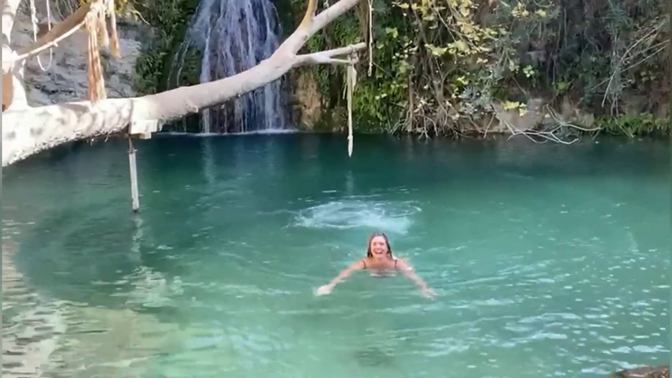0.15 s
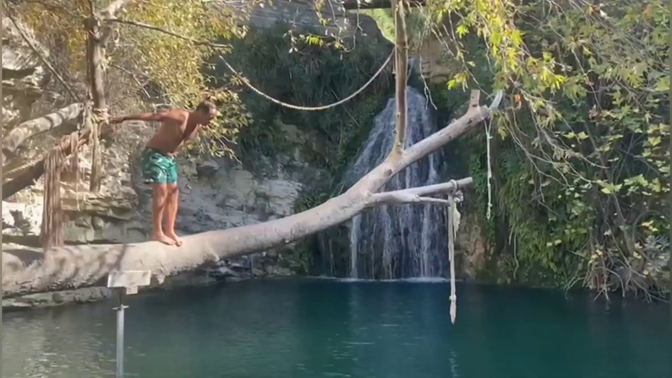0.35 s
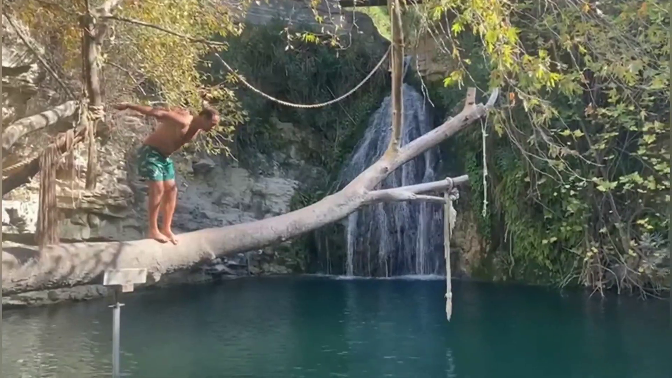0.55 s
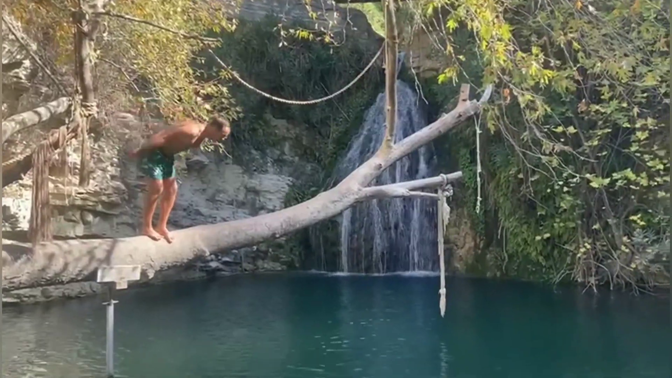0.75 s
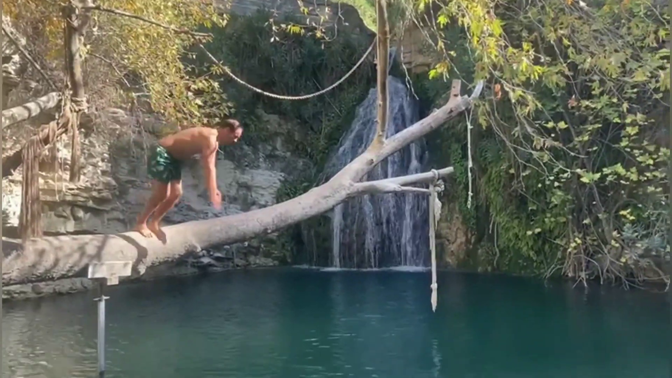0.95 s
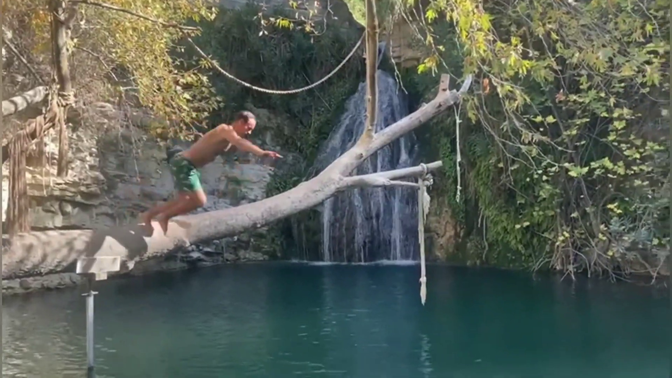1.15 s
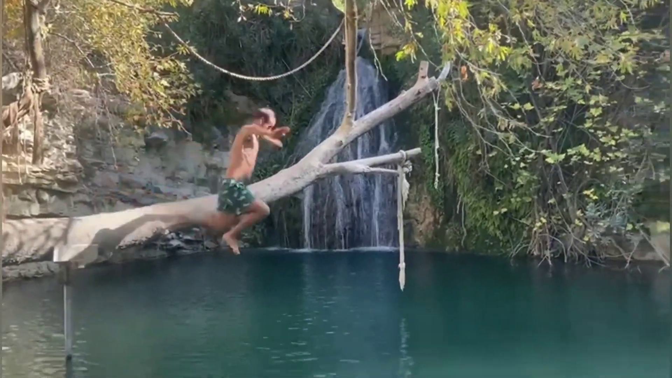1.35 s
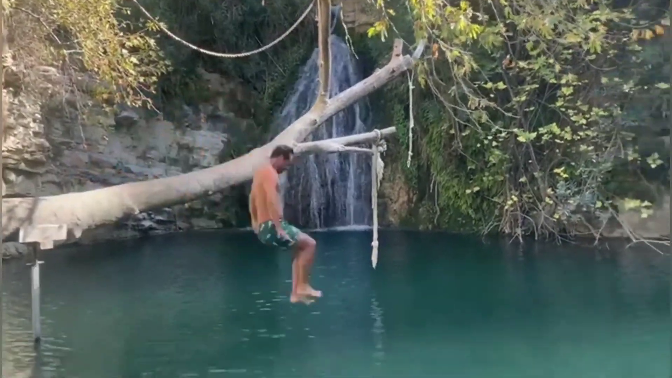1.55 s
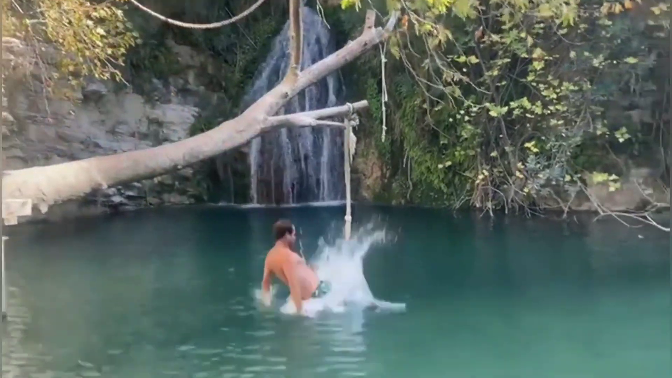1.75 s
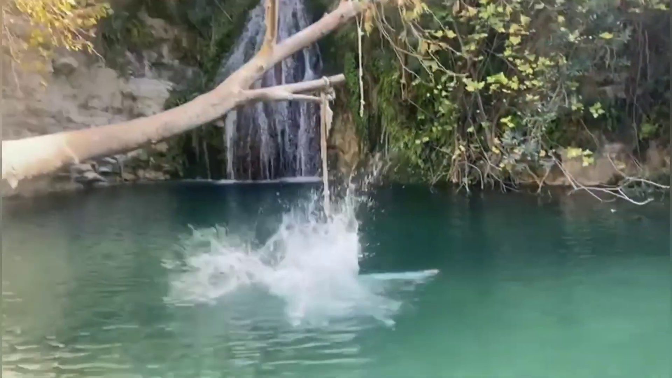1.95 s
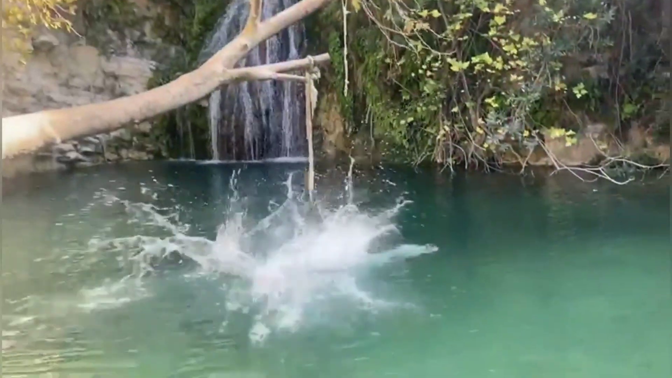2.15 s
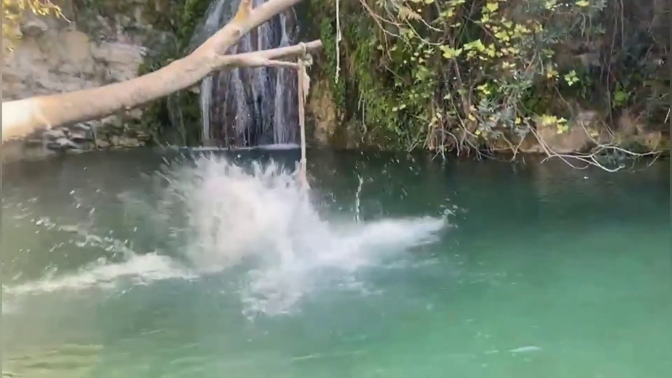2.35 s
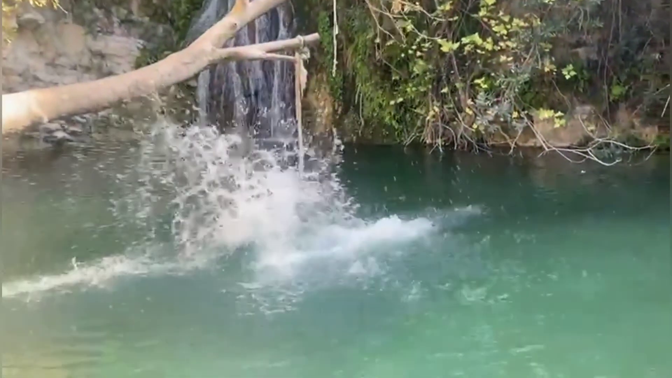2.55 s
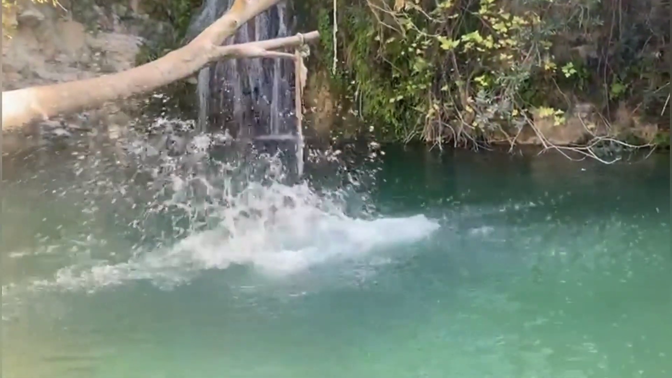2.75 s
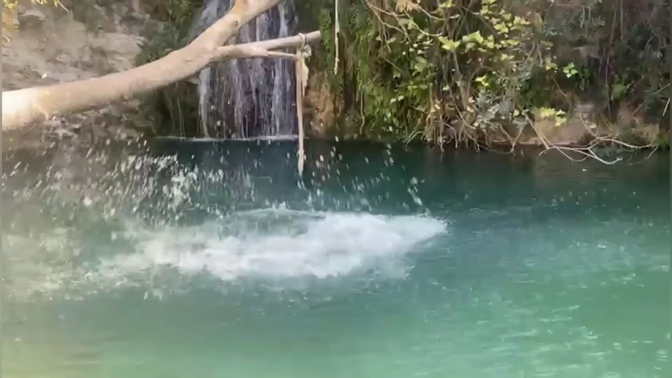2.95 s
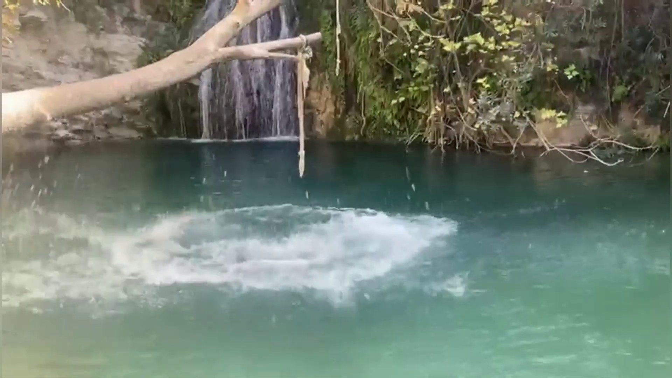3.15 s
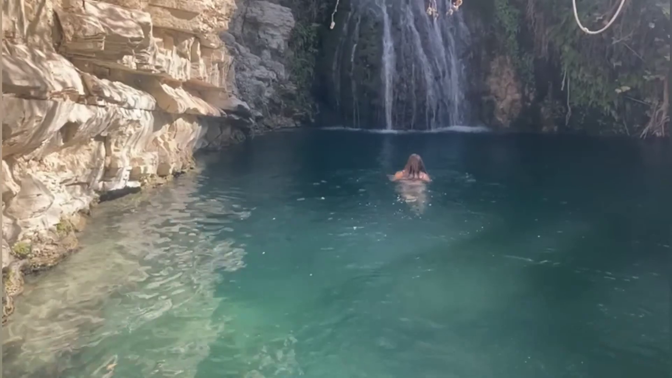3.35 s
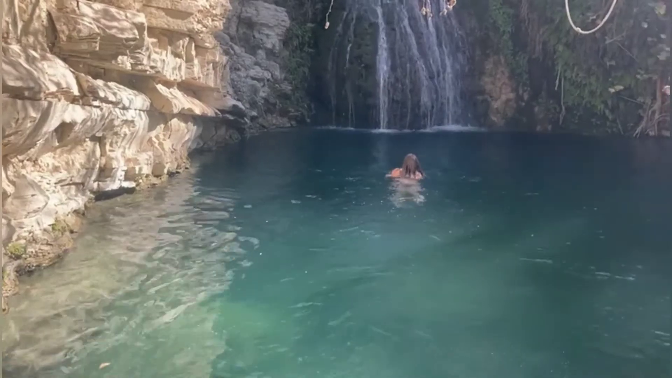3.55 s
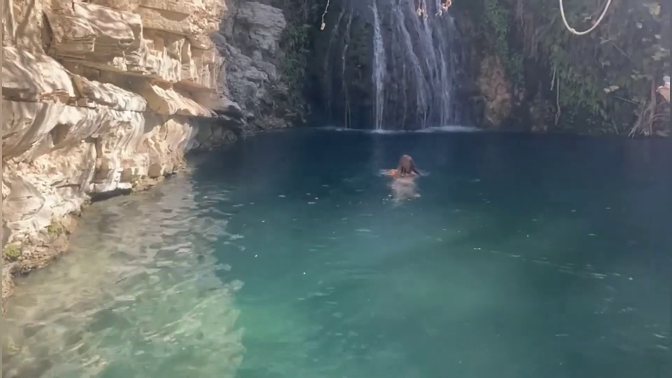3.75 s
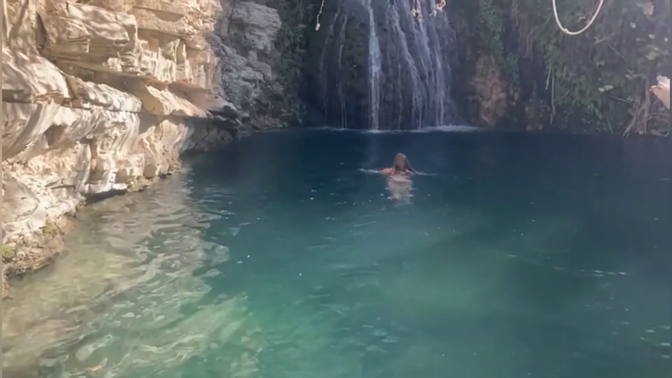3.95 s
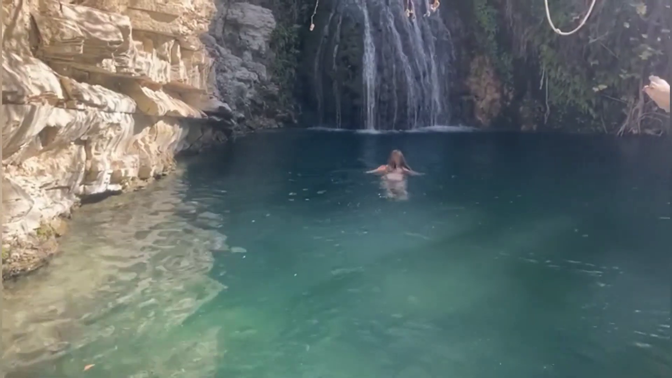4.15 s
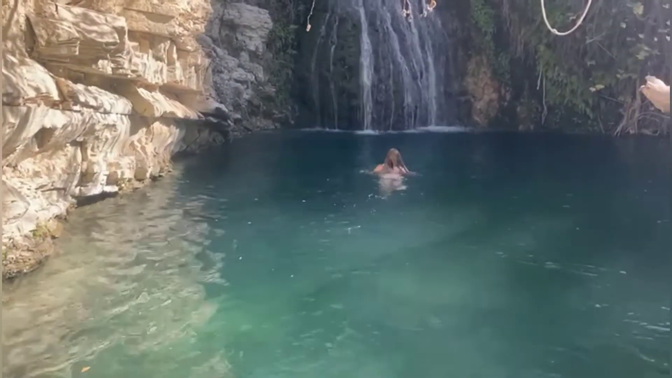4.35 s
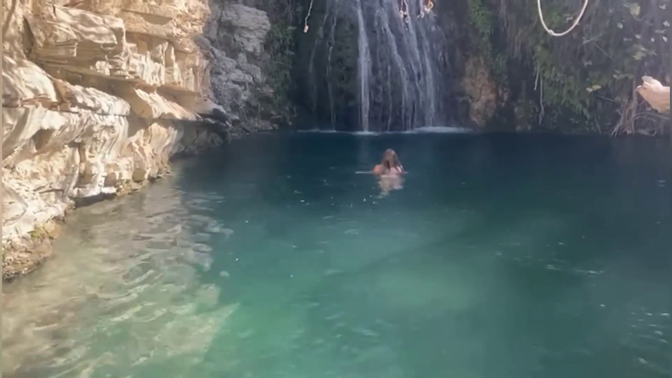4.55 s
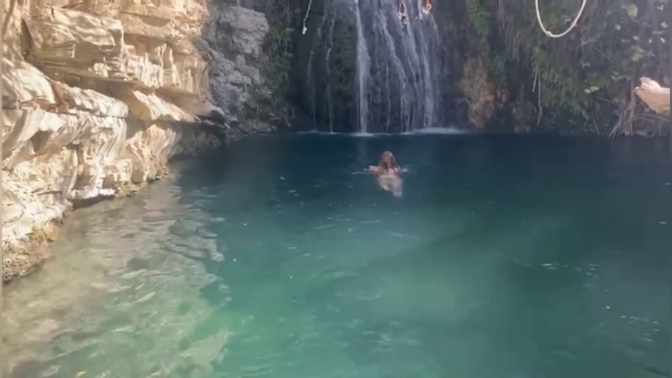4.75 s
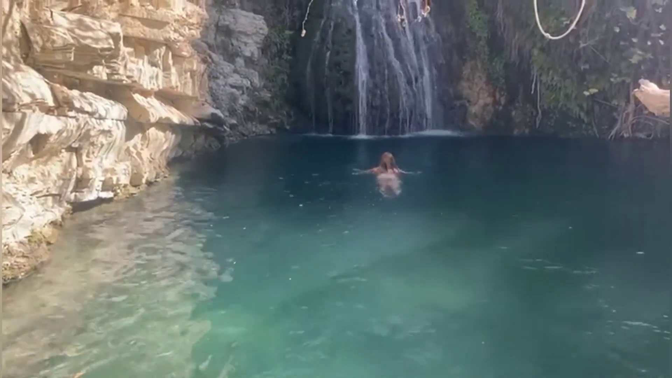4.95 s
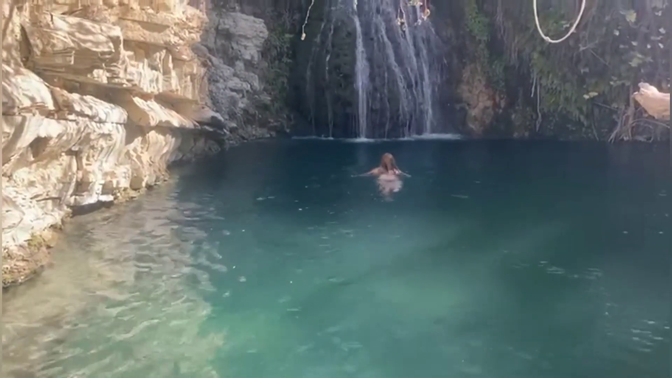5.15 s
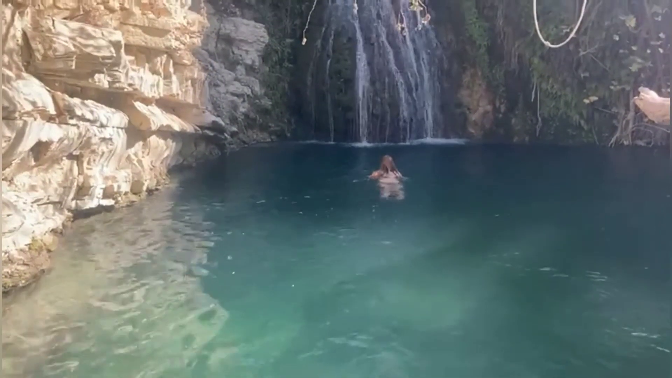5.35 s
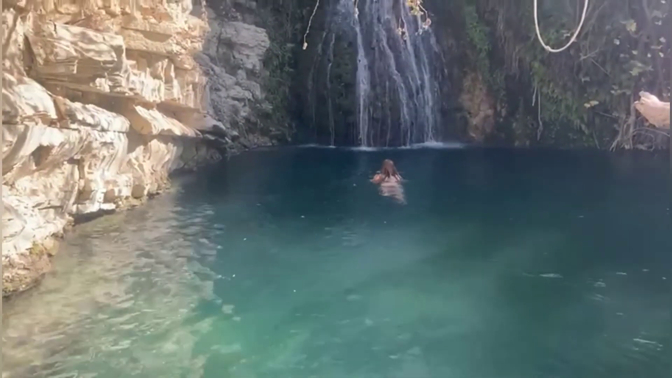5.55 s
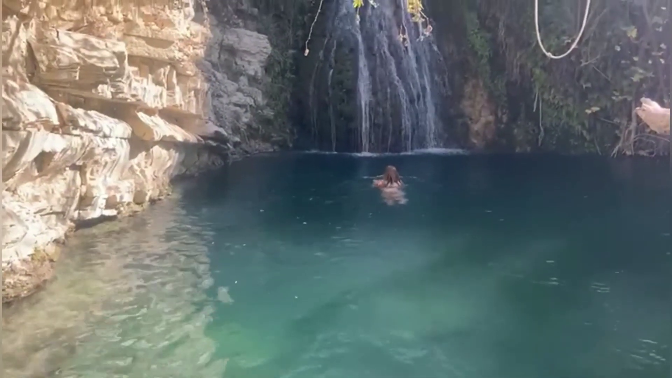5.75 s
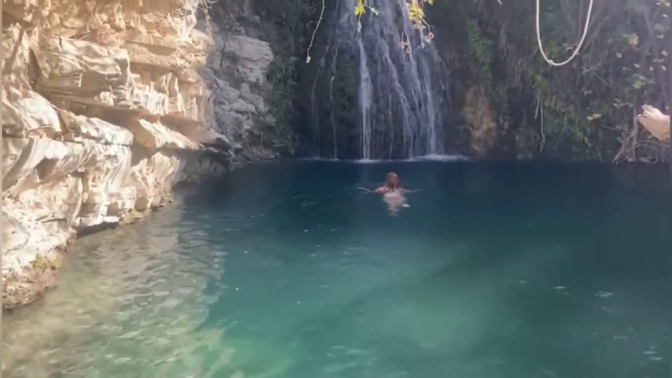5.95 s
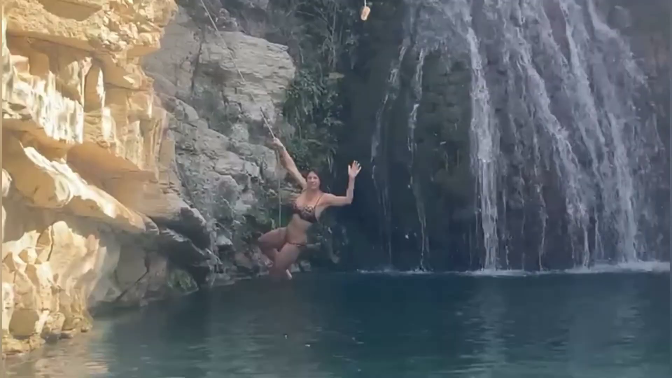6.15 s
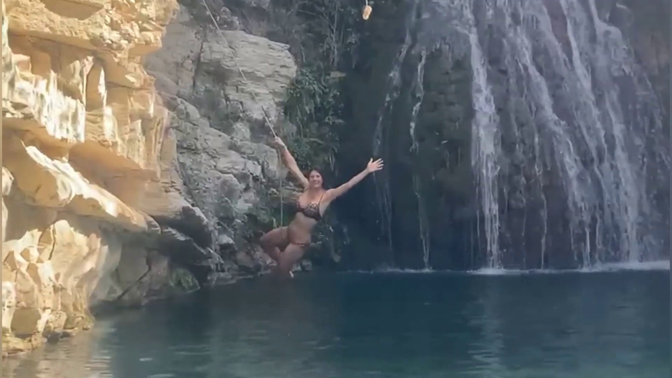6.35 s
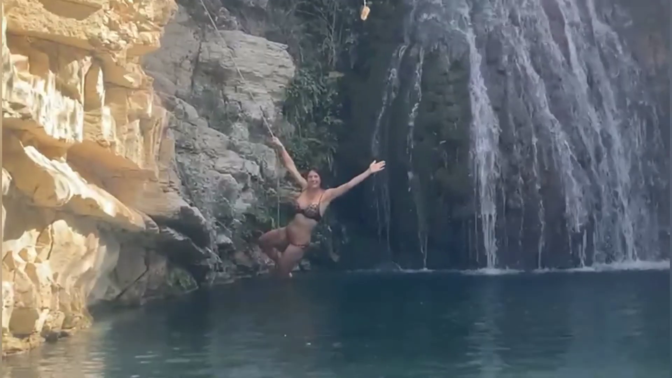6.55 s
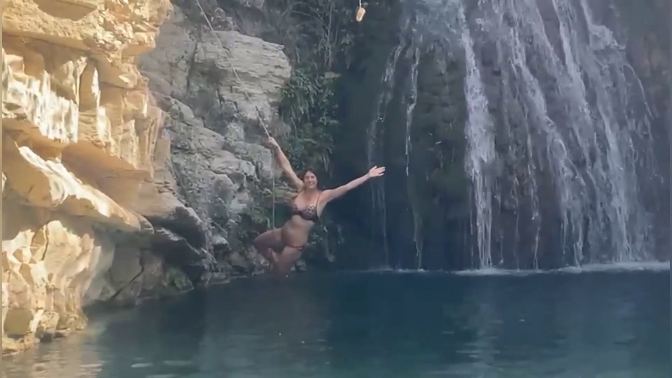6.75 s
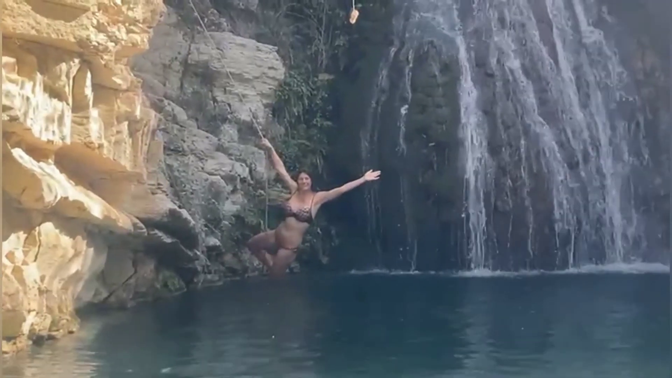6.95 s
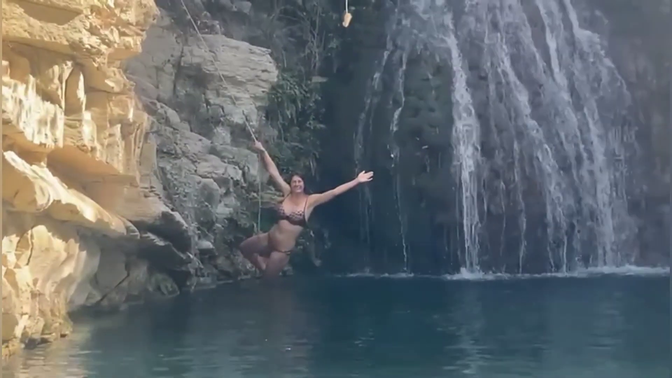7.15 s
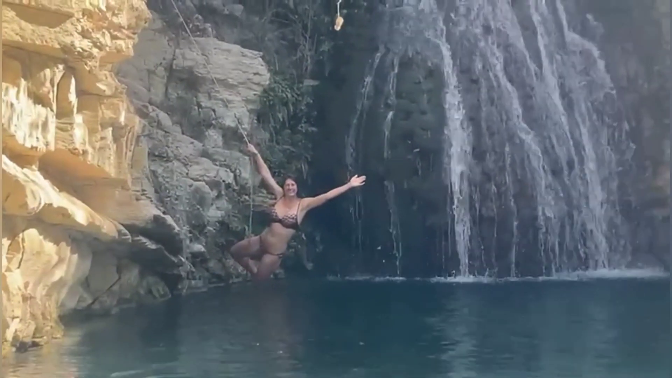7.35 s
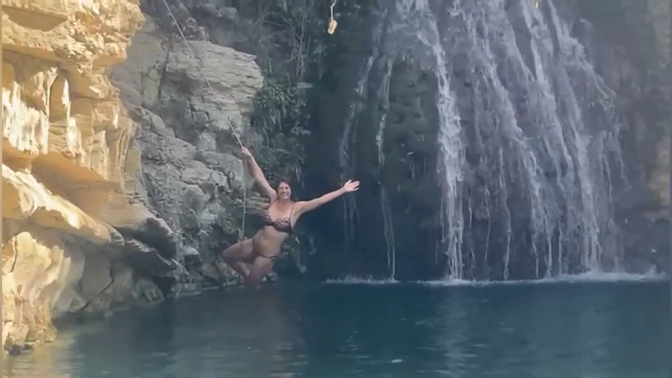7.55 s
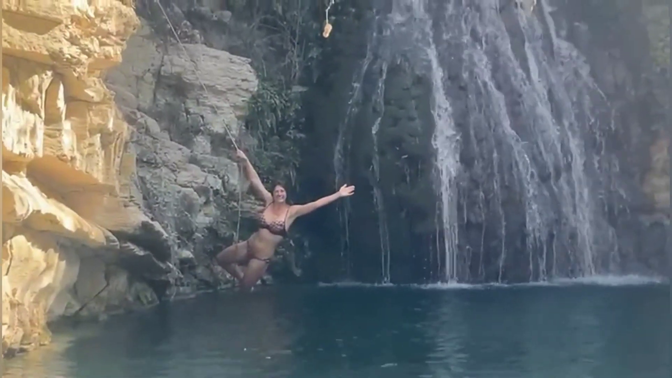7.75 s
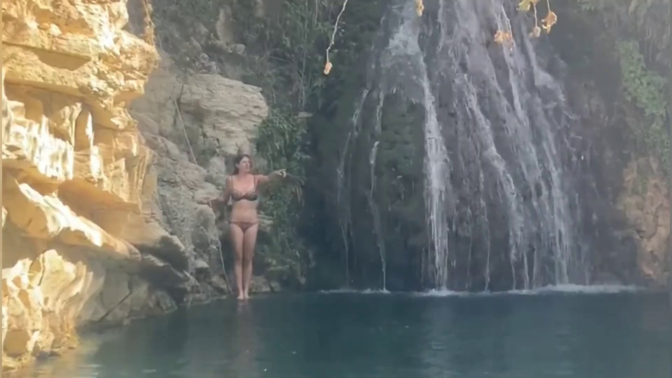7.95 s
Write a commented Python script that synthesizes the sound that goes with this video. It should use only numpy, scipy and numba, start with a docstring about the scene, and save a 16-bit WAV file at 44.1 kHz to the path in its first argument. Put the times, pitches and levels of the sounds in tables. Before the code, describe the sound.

From 0 s a waterfall rushes steadily into a rock pool outdoors, a wash of hiss filled with tiny ringing bubbles. At about 0.65 s there is a small light double tap near the log. At 1.67 s a man's body hits the water: crisp wet slaps and a quick bright fizz, slightly left. From 1.84 s more slaps and coarse drops follow as the cavity closes, with a very strong low gulp at 1.99 s and a throbbing rumble of bubbles until about 2.3 s. Spray surges again around 2.2 to 2.4 s, then drops patter and mist hisses down until 3.2 s. A nearly silent break lasts about 0.05 s. The waterfall then returns alone from another place, rising slightly over the first second, with faint single plops near 3.9, 4.5, 5.6 and 5.8 s. At 6.1 s its tone shifts as it is heard face on, continuing steadily with a few tiny plops after 7 s.

```python
"""Jump into a pool under a waterfall

A waterfall rushes into a rock pool, made of many ringing bubbles over a wash of hiss. A man jumps in from a log:
two slaps (spikes, wet cracks, short rings), a burst of spray, a deep glug and a rumble of bubbles as the air
cavity collapses, then falling drops. After a brief, nearly silent break the fall is heard from a second spot
on the bank, later facing it, with single plopping bubbles.
"""
import sys
import numpy as np
from scipy import signal
from scipy.fft import rfft, irfft, next_fast_len
from scipy.io import wavfile
from scipy.ndimage import uniform_filter1d, map_coordinates
from numba import njit

SR = 44100
rng = np.random.default_rng(int(sys.argv[2]) if len(sys.argv) > 2 else 0)


def int16_out(signal):
    """Quantize to a 16-bit WAV file."""
    q = np.round(np.clip(np.atleast_2d(signal).T, -1, 1) * 32767)
    wavfile.write(sys.argv[1], SR, q.astype(np.int16))


N = 352359
TIME = np.arange(N) / SR

# Tone colour of the fall from beside the log, from the bank, and facing it: f/Hz, level per Hz/dB
FALL_AT_LOG = [(8, -38), (25, -6), (60, 0), (120, -5), (350, -1), (540, -9), (660, -3.5), (780, -8),
               (1020, -3.5), (1220, -7), (1550, -2.5), (2150, -7), (2450, -5.5), (3300, -9.5),
               (6000, -10.5), (8300, -10.5), (11500, -10.5)]
FALL_AT_BANK = [(8, -34), (25, -3), (60, -1), (130, -8), (215, 0.5), (360, -6.5), (660, -1), (820, -6.5),
                (1050, 1), (1250, -5), (1580, -2), (1950, -4), (2300, -7.5), (3000, -7.5), (4300, -7),
                (5600, -13.5), (8500, -8), (11500, -11.5)]
FALL_FACING = [(8, -36), (25, -3), (70, 0.5), (120, -8), (210, 0), (320, -7), (400, -2), (1100, -1),
               (1780, -2), (2400, -8), (4200, -7.5), (5800, -11), (8500, -8), (11500, -10)]
# Tone colour of thrown water, of the bubble cloud and of the foam: f/Hz, level per Hz/dB
SPRAY_COLOUR = [(8, -35), (40, -17), (150, -3), (340, 0.5), (550, 0.5), (780, -3.5), (960, 5), (1170, -3),
                (1600, 0.5), (2500, -10), (4200, -9.5), (6000, -14.5), (8000, -8.5), (11500, -7)]
CLOUD_COLOUR = [(20, -22), (45, -1), (76, -3), (130, -2), (200, -0.5), (320, -8), (430, -10.5), (560, -11),
                (1500, -35)]
FOAM_COLOUR = [(20, -30), (90, -10), (150, 0.5), (220, -1), (330, -2), (450, -10), (700, -13), (1500, -40)]
# Tone colour of the smaller parts of the splash: f/Hz, level per Hz/dB
TICK_COLOUR = [(400, -4), (1400, 3), (3500, -1), (11500, -3)]
MIST_COLOUR = [(600, -15), (2500, 4.5), (5500, 0), (8000, 2), (11500, 1.5)]
FIZZ_COLOUR = [(500, -12), (3000, 3), (5500, -1.5), (7000, -2), (11500, -1)]
SPIT_COLOUR = [(400, -9), (1000, 3), (2400, 6), (4200, 0.5), (5500, -11), (11500, -21)]
HEAVE_COLOUR = [(25, -25), (48, 1), (130, -1), (220, -20), (600, -60)]
BURP_COLOUR = [(120, -12), (360, 5), (520, -7), (1500, -35)]
# Sharp contacts: a small tick, then the body, the cavity walls and gobs of spray on the water:
# t/s, ring level/dB, f/Hz, cycles to fade by 60 dB, crack level against the ring/dB, spike level/dB
SLAPS = [(0.6406, -18.5, 1570, 16, -23, -27), (.6555, -27, 1570, 14, -18, -38),
         (1.6688, -22, 2400, 12, -14, -7.5), (1.67, -18, 2430, 18, -12, -28),
         (1.6718, -15.5, 600, 8.6, -10, -30), (1.6828, -19, 2410, 34, -4, -12),
         (1.6837, -12, 1040, 14, -15, -34), (1.767, -25, 1710, 30, -12, -27),
         (1.8398, -16.5, 393, 14, -14, -24), (1.8432, -20, 640, 14, -11, -24),
         (1.857, -24, 1500, 20, -11, -29), (1.8592, -19, 1000, 26, -10, -26),
         (1.8623, -23, 1000, 12, -10, -21)]
# Big air pockets pinching off after the jump: t at the loudest/s, level/dB, f/Hz, cycles from swell to peak
GLUGS = [(1.6871, -18, 306, 0.64), (1.8413, -24, 161, 0.64), (1.8457, -21, 178, .7),
         (1.8628, -17.5, 277, 1.8), (1.8771, -21, 337, 1), (1.893, -24, 414, 3.2), (1.8984, -26, 139, 1),
         (1.9075, -31, 77, 3), (1.9578, -23, 126, 3.2), (1.967, -30, 94, 2.2), (1.9847, -17.5, 337, 1.5),
         (1.9896, -6.5, 207, 1.03), (2.0016, -24, 178, 1.5), (2.0192, -23, 114, 3), (2.0307, -23, 306, 3),
         (2.0405, -20, 178, 1), (2.054, -28, 77, 3), (2.0813, -24, 239, 1.5), (2.0989, -22, 217, 0.74),
         (2.1302, -21, 178, .7), (2.150, -23, 228, 1.5), (2.1712, -25, 139, .7), (2.1714, -21.5, 306, 2.2),
         (2.2028, -27, 55, 1.5), (2.2111, -24, 291, 1.5), (2.2628, -32, 58, 1.5), (2.467, -37, 211, 3.1)]
# Single bubbles at the foot of the fall: t at the loudest/s, level/dB, f/Hz
PLOPS = [(3.876, -37, 700), (4.545, -34, 530), (5.588, -38, 1530), (5.764, -36.5, 270), (7.12, -37, 1340),
         (7.393, -47, 275), (7.628, -48, 920), (7.758, -39, 1895)]
# Water thrown up by the entry, by the rebound jet, and raining back:
# start t/s, hold/s, drop level/dB, mist level/dB
THROWS = [(1.67, 0.055, -32.5, -30.5), (2.08, 0.14, -34.5, -35), (2.658, 0.343, -51, -31)]
# Coarse drops torn off by the entry and the closing cavity, then landing in clumps: start t/s, hold/s, level/dB
SPITS = [(1.735, .05, -37.5), (1.813, 0.048, -33.5), (2.215, .02, -41), (2.848, 0.26, -44),
         (3.135, 0.032, -36)]
# The cloud heaves as the cavity closes, pinches off and rebounds: start t/s, hold/s, level/dB
HEAVES = [(1.832, .02, -34), (1.9, .155, -32), (2.168, .05, -30.5), (2.25, .04, -35)]
# How alike the two microphone ports sound: f/Hz, coherence from 0 to 1
ALIKE_AT_LOG = [(60, 1), (260, 0.99), (420, 0.91), (720, 0.038), (1050, 0.74), (1800, 0.2), (2300, 0.54),
                (3000, 0.022), (4200, 0.65), (5500, 0.58), (7000, 1), (11500, 1)]
ALIKE_AT_BANK = [(160, 1), (260, 0.99), (420, 0.71), (700, 0.3), (1100, 0.31), (1800, 0.49), (2300, 0.62),
                 (3000, 0.059), (3900, 0.41), (5000, 0.18), (6300, 0.93), (7600, 1), (11500, 1)]
# Phase between the two ports, which hollows the middle at some pitches: f/Hz, lead of the left/radians
PHASE_AT_LOG = [(0, 0), (4200, 0), (5500, -3.1), (6700, -6.3), (7500, -6.3), (8700, -9.4), (9600, -9.4),
                (10900, -12.6)]
PHASE_AT_BANK = [(0, 0), (1700, 0), (2300, -3.1), (3700, -6.3), (4400, -6.3), (5400, -9.4), (6700, -9.4),
                 (7700, -6.3), (8400, -6.3), (9300, -3.1), (10100, -3.1), (11000, 0)]
# Balance of the ports: f/Hz, left minus right/dB
TILT_AT_LOG = [(100, -0.5), (600, 1), (1000, 5), (2000, 2), (3500, 2), (6000, -1)]
TILT_AT_BANK = [(100, 0.2), (500, -1.4), (1000, -2), (2000, -0.2), (3500, -1.5), (6000, 0)]
# The three port tables of each spot: likeness, phase, balance
AT_LOG = (ALIKE_AT_LOG, PHASE_AT_LOG, TILT_AT_LOG)
AT_BANK = (ALIKE_AT_BANK, PHASE_AT_BANK, TILT_AT_BANK)
# The break between the two spots: start t/s, end t/s
BREAK = (3.201, 3.248)

TURN_S = 6.1  # when the fall starts to be heard face on
LOG_DB, BANK_DB = -34, -32  # the steady fall from each spot
SETTLE_DB, SETTLE_S = 1.5, 0.8  # after the break the rush starts this much lower and comes up in this time
FALL_FLUTTER_DB, SPRAY_FLUTTER_DB = 0.6, 1.1  # depth of the quick random level changes
SWARM_DB = 2.5  # depth of the swarms of like bubbles in the fall
TRICKLE_DB, TRICKLES_PER_S = -12.5, 200  # thin strands dripping singly; mixed in beside the rush
ENTRY_S, CAVITY_S = 1.667, 1.835  # the body meets the water; the cavity behind it starts to close
SPIKE_HZ, CRACK_TOP_HZ = 2300, 4270  # centre of a slap's pressure spike; upper edge of its crack
CRACK_T60_S = 0.013  # time for a crack to fade by 60 dB
# Later throws swell more slowly
THROW_RISE_S, RISE_GROWS_S_PER_S, THROW_FALL_DB_PER_S = 0.094, 0.11, 95
PATTER_DB, PATTER_GROWS_DB_PER_S = -35, 2  # stray drops from the entry until the break
TICK_DB, TICKS_PER_S = -14, 220  # fat drops that land singly, against the patter
SKIM_DB, SKIM_HOLD_S, SKIM_FALL_DB_PER_S = -27, 0.014, 700  # fine spray squeezed between skin and water
SPITS_PER_S, SPIT_RISE_S, SPIT_FALL_DB_PER_S = 700, 0.014, 200
# The cloud of air dragged under water, and the foam that murmurs from the entry on
CLOUD_DB, CLOUD_RISE_S, CLOUD_HOLD_S, CLOUD_FALL_DB_PER_S = -34, 0.015, 0.32, 100
FOAM_DB, FOAM_HOLD_S, FOAM_FALL_DB_PER_S = -37.5, 0.68, 28
HEAVE_RISE_S, HEAVE_FALL_DB_PER_S = 0.006, 250
# Bubbles that surface from the moment the cavity starts to close
BURP_DB, BURPS_PER_S, BURP_HOLD_S, BURP_FALL_DB_PER_S = -40.5, 1500, 0.42, 33
GLUG_SAG = 0.03  # a pocket loses twice this share of its pitch from swell to peak
PLOP_CYCLES = 3.7  # from swell to peak
GAP_DB, GAP_FALL_DB_PER_S = -32.5, 600  # what is left of the sound as the break starts, and its fade
LOW_CUT_HZ, TOP_HZ = 22.5, 11800  # the microphone's bass roll-off; the band limit


def amp(db):
    """Decibels to gain."""
    return 10 ** (np.asarray(db) / 20)


def unit(x):
    """Scale to rms 1."""
    return x / np.sqrt(np.mean(x ** 2) + 1e-20)


def along(points, hz):
    """Read a table of (f/Hz, value) on a log axis."""
    f, v = np.transpose(points)
    return np.interp(np.log(hz + 1), np.log(f + 1), v)


def wobble(rate):
    """A smooth random curve, with this many random knots a second."""
    return map_coordinates(rng.standard_normal(1000), [TIME * rate], mode="wrap")


def swell(start, rise, hold, fall_db_per_s):
    """Gain that rises, holds, then dies away."""
    t = TIME - start
    return np.clip(t / rise, 0, 1) * amp(-fall_db_per_s * np.maximum(t - rise - hold, 0))


def filtered(x, response):
    """Multiply the spectrum of x by a response that depends on frequency."""
    m = next_fast_len(N + 8192)
    return irfft(rfft(x, m) * response(np.fft.rfftfreq(m, 1 / SR)), m)[..., :N]


@njit
def ring_bubbles(start, step, size, cycles, rise, length):
    """Sum of damped sines whose pitch rises as each bubble nears the surface."""
    out = np.zeros(length)
    for i in range(len(start)):
        life = cycles / step[i]  # samples; step is cycles per sample
        for k in range(min(int(life), length - start[i])):
            u = k / life
            out[start[i] + k] += size[i] * np.exp(-5 * u) * np.sin(2 * np.pi * step[i] * k * (1 + rise * u))
    return out


def bubbles(rate, cycles, spread_db):
    """Bubbles of all sizes, a few much stronger than the rest; roughly even energy per Hz."""
    when, pitch, strength = rng.random((int(rate * N / SR), 3)).T
    place = np.sqrt(pitch)  # 0 is the lowest pitch, 1 the highest
    hz = 150 * (11500 / 150) ** place
    boost = amp(spread_db * np.minimum(-np.log(1 - strength), 5))
    size = hz / np.sqrt(place + 0.05) * boost
    start = (when * N).astype(np.int64)
    return unit(ring_bubbles(start, hz / SR, size, cycles, 0.11, N))


def drips(rate, cycles, spread_db):
    """Two unrelated streams of bubbles, with this many bubbles a second in each."""
    return np.array([bubbles(rate, cycles, spread_db) for _ in range(2)])


def water(rate, cycles, spread_db, share, merge_hz):
    """Two unrelated streams: single bubbles over a wash; above merge_hz they blur into plain hiss."""
    def single(hz):
        return np.clip(share, 0, 1) / (1 + (hz / merge_hz) ** 2)

    wash = filtered(rng.standard_normal((2, N)), lambda hz: np.sqrt(1 - single(hz)))
    near = filtered(drips(rate, cycles, spread_db), lambda hz: np.sqrt(single(hz)))
    return wash + near


def gurgle(pair, depth_db, top_hz):
    """Bubbles come in short swarms of like size, each lifting a narrow band."""
    hz, _, z = signal.stft(pair, SR, nperseg=1024)
    field = rng.standard_normal(z.shape[1:])
    field = uniform_filter1d(field, size=3, axis=0)
    field = uniform_filter1d(field, size=3, axis=1)
    gain = amp(depth_db * unit(field) / (1 + (hz[:, None] / top_hz) ** 2))
    gain /= np.sqrt(np.mean(gain ** 2, axis=1, keepdims=True))  # keeps the average tone colour
    return signal.istft(z * gain, SR, nperseg=1024)[1][:, :N]


def at_ports(pair, colour, spot):
    """Colour two streams and spread them over the two microphone ports; rms 1."""
    alike, lead, tilt = spot

    def colour_and_mix(hz):
        turn = np.arccos(np.clip(along(alike, hz), 0, 0.998)) / 2
        return amp(along(colour, hz)) * np.array([np.cos(turn), np.sin(turn)])

    def path(hz):
        half = np.array([[0.5], [-0.5]])  # left and right each take half the difference
        phase = np.interp(hz, *np.transpose(lead)) * np.minimum(hz / 500, 1)  # reduced below 500 Hz
        return amp(half * along(tilt, hz)) * np.exp(1j * half * phase)

    mid, side = filtered(pair, colour_and_mix)
    return unit(filtered(np.array([mid + side, mid - side]), path))


def waterfall():
    """Strands of water drum on the pool; the rocks colour the rush differently from each side."""
    rush = water(rate=3000, cycles=21.0, spread_db=1.5, share=0.3, merge_hz=3680)
    rush = gurgle(rush, depth_db=SWARM_DB, top_hz=8540) * amp(FALL_FLUTTER_DB * wobble(24))
    trickle = drips(TRICKLES_PER_S, cycles=22.0, spread_db=1.0)
    trickle = filtered(trickle, lambda hz: 1 / (1 + (hz / 4000) ** 2))
    stream = rush + amp(TRICKLE_DB) * trickle
    log = amp(LOG_DB) * at_ports(stream, FALL_AT_LOG, AT_LOG)
    turned = np.clip((TIME - TURN_S) / 0.05, 0, 1)
    aside = at_ports(stream, FALL_AT_BANK, AT_BANK)
    facing = at_ports(stream, FALL_FACING, AT_BANK)
    bank = (1 - turned) * aside + turned * facing
    settling = np.clip(1 - (TIME - BREAK[1]) / SETTLE_S, 0, 1)
    return np.where(TIME < BREAK[0], log, amp(BANK_DB - SETTLE_DB * settling) * bank)


def slaps():
    """Each contact is a pressure spike, a wet crack and the brief ring of a pocket of trapped air."""
    out = np.zeros(N)
    t = np.arange(SR // 10) / SR
    wet = signal.butter(3, CRACK_TOP_HZ, fs=SR)
    for s, db, hz, cycles, crack_db, spike_db in SLAPS:
        t60 = cycles / hz  # seconds to fade by 60 dB
        ring = np.sin(2 * np.pi * hz * t) * amp(-60 * t / t60)
        noise = unit(signal.lfilter(*wet, rng.standard_normal(len(t))))
        crack = noise * amp(crack_db - 60 * t / CRACK_T60_S)
        out[round(s * SR):][:len(t)] += amp(db) * (ring + crack)
        u = np.minimum((np.pi * SPIKE_HZ * (TIME - s)) ** 2, 50)
        out += amp(spike_db) * (1 - 2 * u) * np.exp(-u)
    return out


def rock_walls(x, t60, delay):
    """A short dull scatter from the cliffs around the pool: fading noise, different on each side."""
    t = np.arange(SR // 2) / SR
    dull = signal.lfilter([1], [1, -0.6], rng.standard_normal((2, len(t))))
    tail = dull * amp(-60 * t / t60) * (t > delay)
    return signal.fftconvolve(x[None], tail / np.linalg.norm(tail[0]), axes=1)[:, :N]


def spray():
    """Sheets of thrown water tear into drops that patter back, a few fat ticks, and a fine hissing mist."""
    drop_power = (amp(PATTER_DB) * swell(ENTRY_S, 0.0056, 0, -PATTER_GROWS_DB_PER_S)) ** 2
    mist_power = np.zeros(N)
    for s, hold, drops_db, mist_db in THROWS:
        rise = THROW_RISE_S + RISE_GROWS_S_PER_S * (s - ENTRY_S)
        sheet = swell(s, rise, hold, THROW_FALL_DB_PER_S)
        drop_power += (amp(drops_db) * sheet) ** 2
        mist_power += (amp(mist_db) * sheet) ** 2
    patter = water(rate=2500, cycles=4.1, spread_db=1.5, share=0.42, merge_hz=8000)
    drops = at_ports(gurgle(patter, depth_db=2.2, top_hz=5000), SPRAY_COLOUR, AT_LOG)
    ticks = at_ports(drips(TICKS_PER_S, cycles=4.4, spread_db=3.2), TICK_COLOUR, AT_LOG)
    mist = at_ports(rng.standard_normal((2, N)), MIST_COLOUR, AT_LOG)
    falling = np.sqrt(drop_power) * (drops + amp(TICK_DB) * ticks)
    return amp(SPRAY_FLUTTER_DB * wobble(50)) * (falling + np.sqrt(mist_power) * mist)


def spits():
    """A bright fizz shoots out as the body hits; coarse drops follow in bursts."""
    fizz = at_ports(rng.standard_normal((2, N)), FIZZ_COLOUR, AT_LOG)
    skim = amp(SKIM_DB) * swell(ENTRY_S, 0.006, SKIM_HOLD_S, SKIM_FALL_DB_PER_S) * fizz
    coarse = at_ports(drips(SPITS_PER_S, cycles=6, spread_db=1.5), SPIT_COLOUR, AT_LOG)
    bursts = sum(amp(db) * swell(s, SPIT_RISE_S, hold, SPIT_FALL_DB_PER_S) for s, hold, db in SPITS)
    return skim + coarse * bursts


def cloud():
    """Foam murmurs from the entry on; as the cavity closes, the air cloud heaves and throbs and bubbles surface."""
    murmur = at_ports(rng.standard_normal((2, N)), FOAM_COLOUR, AT_LOG)
    foam = amp(FOAM_DB) * swell(ENTRY_S, CLOUD_RISE_S, FOAM_HOLD_S, FOAM_FALL_DB_PER_S) * murmur
    deep = at_ports(rng.standard_normal((2, N)), HEAVE_COLOUR, AT_LOG)
    heave = deep * sum(amp(db) * swell(s, HEAVE_RISE_S, hold, HEAVE_FALL_DB_PER_S) for s, hold, db in HEAVES)
    throb = water(rate=2600, cycles=7.4, spread_db=2.0, share=0.25, merge_hz=1970)
    throb = at_ports(throb, CLOUD_COLOUR, AT_LOG)
    collapse = amp(CLOUD_DB) * swell(CAVITY_S, CLOUD_RISE_S, CLOUD_HOLD_S, CLOUD_FALL_DB_PER_S) * throb
    large = at_ports(drips(BURPS_PER_S, cycles=16, spread_db=0.5), BURP_COLOUR, AT_LOG)
    burps = amp(BURP_DB) * swell(CAVITY_S, CLOUD_RISE_S, BURP_HOLD_S, BURP_FALL_DB_PER_S) * large
    return collapse + heave + foam + burps


def glugs(pockets):
    """An air pocket swells into a few cycles, sinking in pitch as it is pulled down."""
    out = np.zeros(N)
    for s, db, hz, cycles in pockets:
        half = cycles / hz  # seconds from swell to peak
        near = np.abs(TIME - s) < 4 * half
        t = TIME[near] - s
        tone = np.cos(2 * np.pi * hz * t * (1 - GLUG_SAG * t / half))
        out[near] += amp(db) * np.exp(-(t / half) ** 2) * tone
    return out


def scene():
    """The jump's slaps and glugs lie slightly to the left, in front of the fall."""
    hits, pockets = slaps(), glugs(GLUGS)
    echo = amp(-17.5) * rock_walls(hits + pockets, t60=0.2, delay=0.01)
    placed_hits = hits * amp([[1.3], [-1.3]])  # dB for left and right
    placed_pockets = pockets * amp([[0.35], [-0.35]])
    jump = spray() + spits() + cloud() + placed_hits + placed_pockets + echo
    plops = glugs([(*plop, PLOP_CYCLES) for plop in PLOPS])
    return waterfall() + jump * (TIME < BREAK[0]) + plops


def record(dry):
    """Trim the deep bass, nearly silence the break between the spots, and cut steeply above the band limit."""
    running = (TIME < BREAK[0]) | (TIME > BREAK[1])
    gap = amp(GAP_DB - GAP_FALL_DB_PER_S * (np.clip(TIME, *BREAK) - BREAK[0]))
    bass_cut = signal.butter(2, LOW_CUT_HZ, "high", fs=SR, output="sos")
    lean = signal.sosfiltfilt(bass_cut, dry)
    return filtered(lean * np.where(running, 1, gap), lambda hz: 1 / np.sqrt(1 + (hz / TOP_HZ) ** 300))


dry = scene()
out = record(dry)
int16_out(out)
```